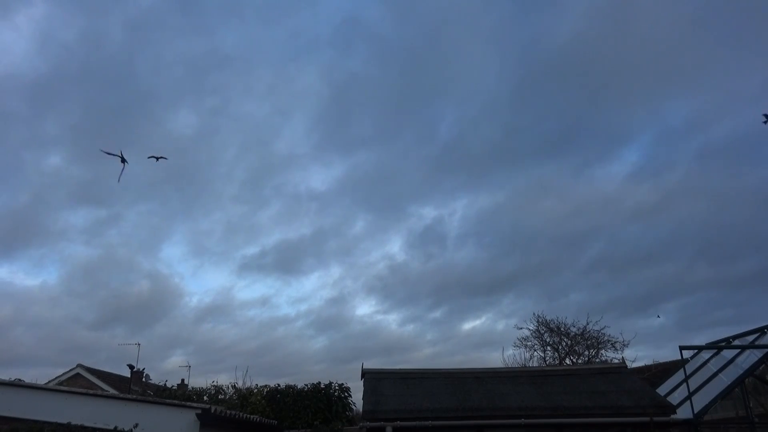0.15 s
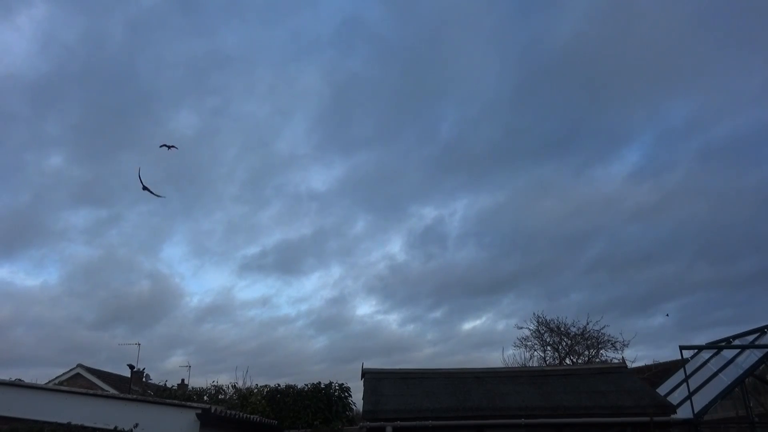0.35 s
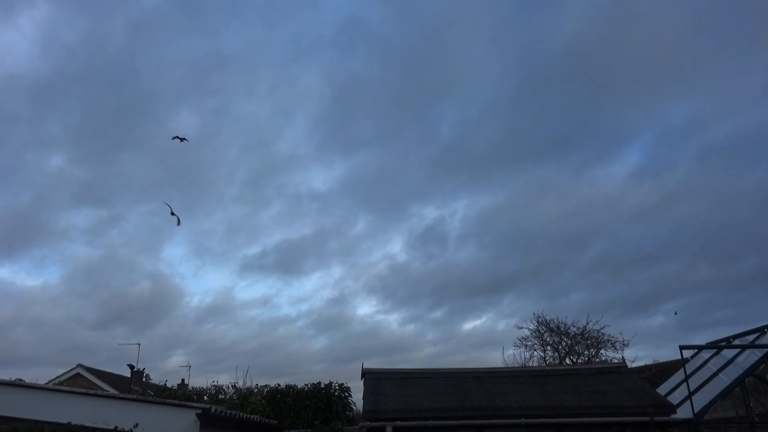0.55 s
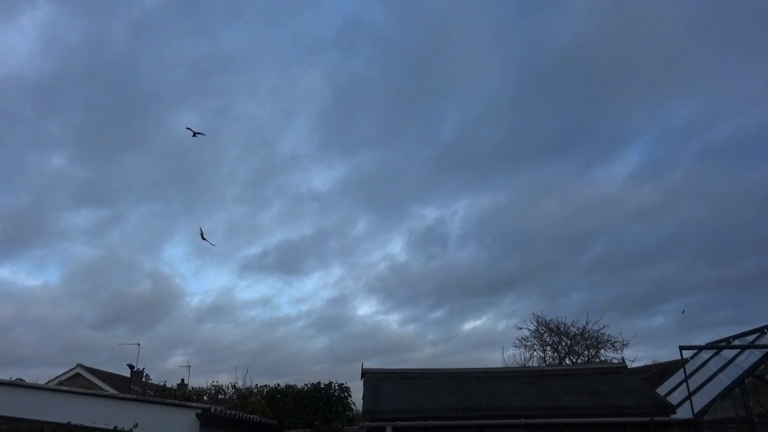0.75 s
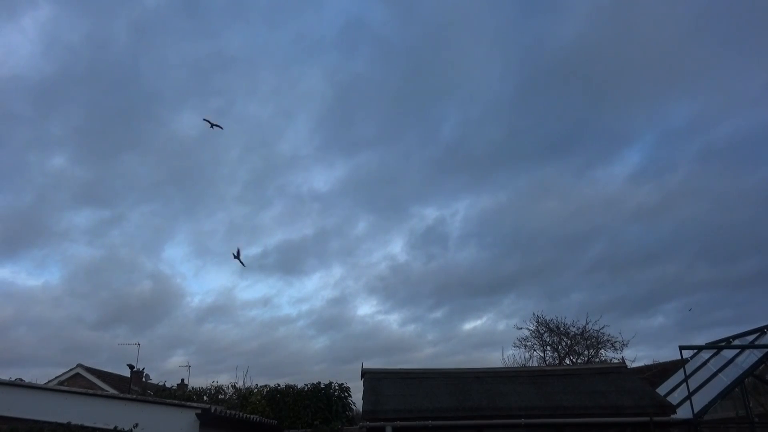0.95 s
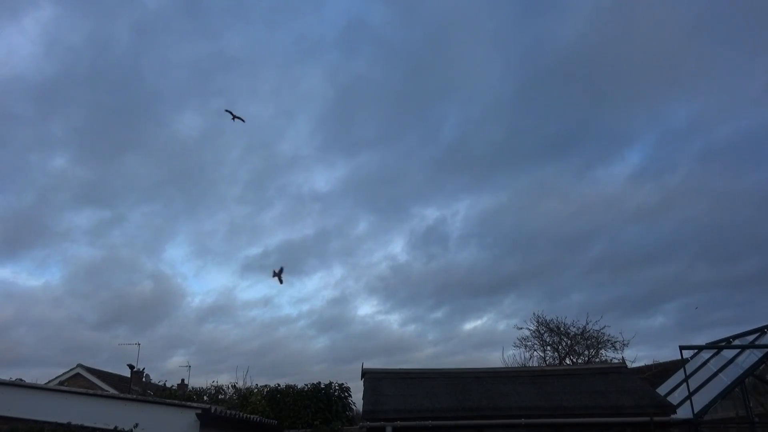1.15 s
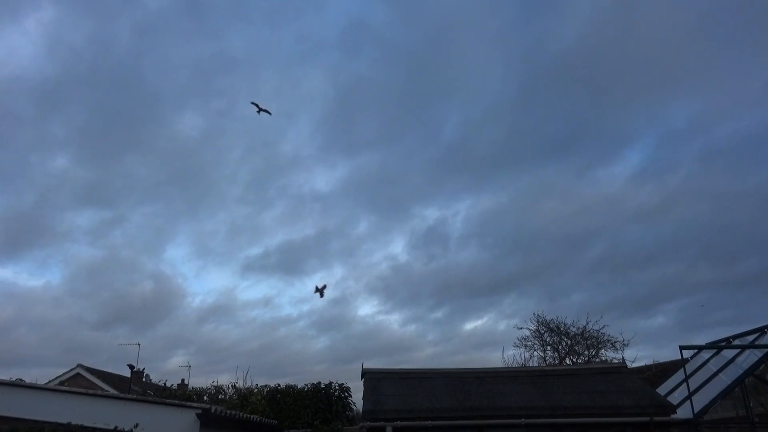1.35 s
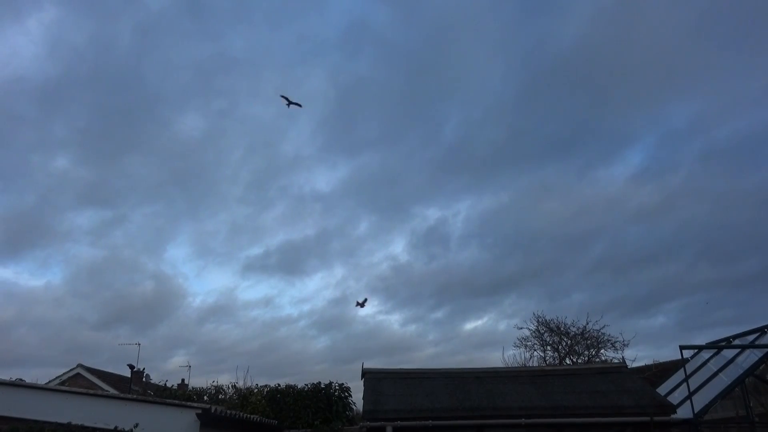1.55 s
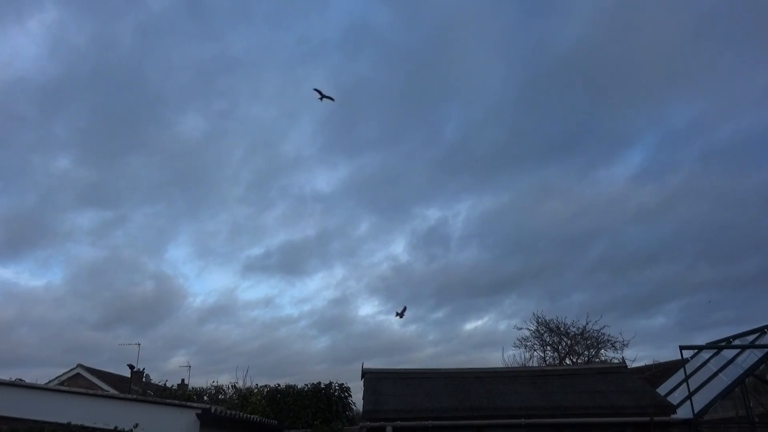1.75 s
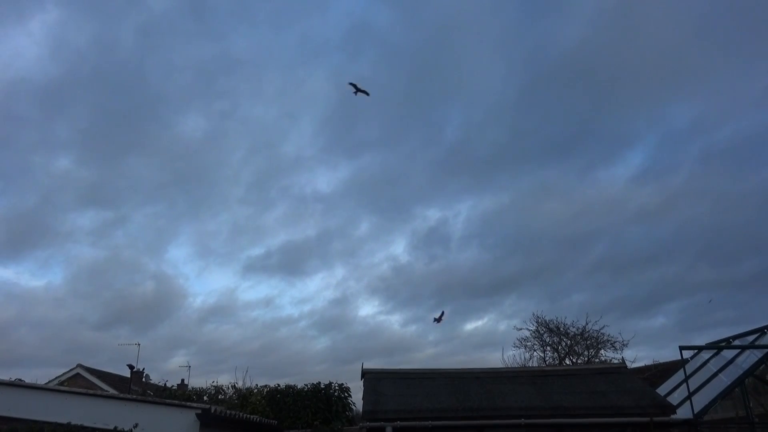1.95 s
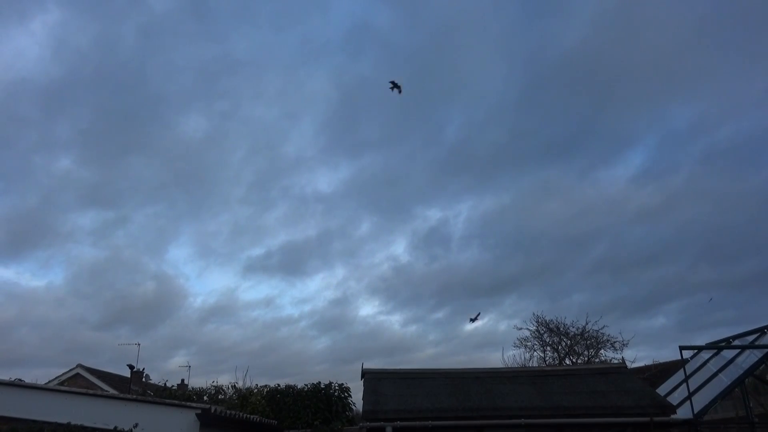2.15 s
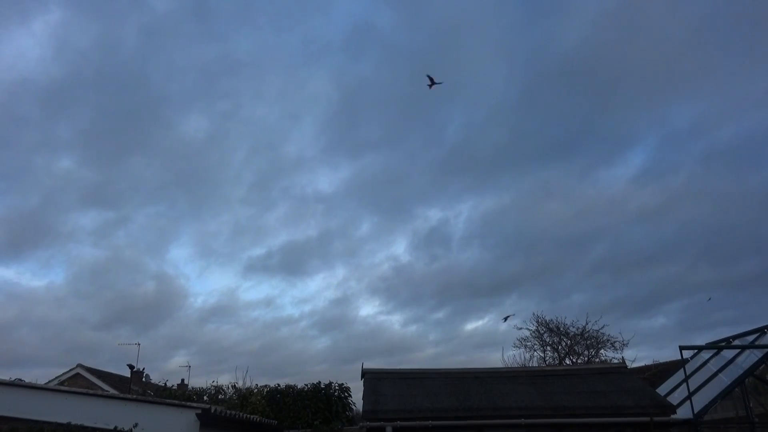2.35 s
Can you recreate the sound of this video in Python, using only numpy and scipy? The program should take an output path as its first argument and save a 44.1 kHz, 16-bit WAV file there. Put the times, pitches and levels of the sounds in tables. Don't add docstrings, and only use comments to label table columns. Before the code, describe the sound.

Thin drawn-out whistle of a circling raptor breaks into quick piped notes above low wind and traffic

```python
import sys
import numpy as np
from scipy import signal
from scipy.fft import rfft, irfft, next_fast_len
from scipy.io import wavfile
from scipy.ndimage import uniform_filter1d, map_coordinates

SR = 44100
rng = np.random.default_rng(int(sys.argv[2]) if len(sys.argv) > 2 else 0)


def boost(x):
    u = np.asarray(x, float) / 20
    return 10 ** u


def log_audio(samples):
    frames = np.atleast_2d(samples).T
    limited = np.clip(frames, -1, 1)
    pcm = np.round(limited * 32767).astype(np.int16)
    wavfile.write(sys.argv[1], SR, pcm)


N = 105840
TIME = np.arange(N) / SR

# t/s, f/Hz, level/dB
LONG_CALL_NOTES = [
    [(.203, 2380, -71), (.218, 2440, -65.5), (.264, 2740, -62), (.282, 2830, -66)],
    [(.277, 3070, -70), (.295, 3030, -75), (.31, 3000, -72), (.322, 2985, -71), (.336, 2900, -73)],
    [(.333, 2830, -63), (.352, 2686, -60.5), (.412, 2540, -59.5), (.488, 2508, -63), (.588, 2414, -66),
     (.638, 2405, -71.5), (.716, 2486, -64.5), (.772, 2430, -58.5), (.794, 2600, -61)],
    [(.792, 2793, -61.5), (.85, 2815, -59), (.958, 2840, -69), (1.04, 2845, -69), (1.075, 2925, -69.5),
     (1.118, 2910, -69), (1.14, 2900, -78)],
    [(1.168, 2916, -72), (1.188, 2939, -66.5), (1.246, 2910, -77), (1.278, 2920, -69), (1.326, 2920, -76),
     (1.352, 2950, -70.5), (1.362, 2960, -74)],
    [(1.372, 2950, -73), (1.388, 2980, -81), (1.416, 2995, -72.5), (1.46, 2976, -78), (1.48, 3000, -70),
     (1.49, 2985, -82)],
    [(1.498, 2960, -77), (1.556, 3000, -78), (1.588, 2925, -75), (1.602, 2930, -80), (1.626, 2890, -71),
     (1.645, 2810, -73), (1.66, 2900, -75), (1.68, 2940, -77), (1.71, 2920, -80)],
]
# t/s, f/Hz, level/dB
PIPED_NOTES = [
    [(1.665, 2210, -77), (1.685, 2146, -65), (1.71, 2180, -72), (1.728, 2420, -65)],
    [(1.725, 2860, -76), (1.76, 3090, -77), (1.778, 3210, -67), (1.836, 3280, -69.5), (1.865, 3190, -65.5),
     (1.906, 3070, -75), (1.962, 2880, -66.5)],
    [(1.95, 2450, -67), (1.975, 2250, -71), (1.995, 2240, -77), (2.018, 2290, -66), (2.03, 2330, -69),
     (2.048, 2700, -60)],
    [(2.047, 3104, -59.5), (2.09, 3330, -54), (2.118, 3388, -52), (2.148, 3310, -53), (2.18, 3245, -56),
     (2.216, 3166, -61), (2.238, 3110, -72)],
    [(2.25, 2575, -62), (2.27, 2360, -65), (2.283, 2290, -65), (2.296, 2450, -69)],
    [(2.296, 2700, -67), (2.303, 2690, -66), (2.31, 2480, -67), (2.322, 2430, -68), (2.336, 2580, -67),
     (2.352, 2950, -74)],
    [(2.36, 2450, -64), (2.372, 2360, -69), (2.39, 2330, -78)],
]
# t/s, left minus right level/dB
BIRD_BEARING = [(0, -6), (.78, -6), (.95, -16), (1.2, -7), (1.45, -17), (1.57, 12), (1.64, -6), (1.85, -9),
                (2.1, -6.5), (2.4, -10)]
# t/s, level/dB
ROOF_REFLECTIONS = [(.3, 4.5), (.5, -8), (1.3, 1), (1.6, 4.5), (1.95, 15), (2.1, 3), (2.3, 8)]
# t/s, length t/s, start f/Hz, end f/Hz, level/dB
FAR_CHIRPS = [(0.328, 0.034, 5200, 4280, -81.5), (0.409, 0.011, 4270, 4720, -78),
              (0.416, 0.023, 3220, 3800, -78), (0.39, .012, 4270, 4500, -82),
              (0.441, 0.011, 5330, 3950, -71), (0.449, 0.011, 4000, 4480, -70.5),
              (0.457, 0.01, 4400, 3880, -80), (0.46, 0.011, 4400, 5200, -84),
              (0.477, 0.011, 3970, 5030, -83), (0.514, .01, 3730, 4400, -84),
              (1.285, 0.034, 3190, 3880, -77), (1.415, 0.022, 3830, 3850, -83),
              (1.405, .018, 4150, 4150, -87), (1.708, .012, 5130, 5060, -77), (1.709, .02, 3300, 5000, -74),
              (1.721, 0.013, 5800, 7700, -82), (1.742, .012, 4100, 3400, -78),
              (1.746, 0.021, 4800, 5220, -75), (1.753, .011, 8200, 3000, -75), (1.76, .01, 4900, 5500, -76),
              (1.764, .011, 7000, 3400, -73), (1.773, 0.013, 5730, 4840, -76),
              (1.814, 0.0093, 5130, 5000, -83), (1.862, .016, 5100, 5040, -85),
              (2.29, .016, 4670, 4400, -83)]
# t/s, length t/s, centre f/Hz, level/dB
CHATTER_BURSTS = [
    (0.444, .04, 4650, -74),
    (1.73, 0.015, 4300, -71),
    (1.775, 0.028, 5200, -75),
    (1.762, 0.098, 2700, -66.5),
    (1.85, 0.084, 4900, -80),
    (2.105, .06, 3930, -74),
    (2.286, 0.16, 4900, -77),
]
# t/s, length t/s, level/dB
WIND_SURGES = [(0.23, 0.11, -43.5), (0.452, 0.13, -41), (0.563, 0.047, -37.5), (0.684, 0.079, -30.5),
               (0.804, 0.12, -39), (0.983, 0.047, -44), (1.132, 0.081, -49), (1.285, 0.075, -39),
               (1.412, 0.094, -40.5), (1.537, 0.076, -37), (1.668, 0.082, -36), (1.77, 0.07, -44.5),
               (1.907, 0.059, -42.5), (2.012, 0.081, -42), (2.145, 0.04, -48.5), (2.27, 0.051, -57)]
# t/s, length t/s, level/dB, top f/Hz
PORT_EDDIES = [(0.169, 0.046, -56, 90), (0.281, 0.087, -64, 80), (0.403, 0.1, -54, 92),
               (0.548, 0.1, -55, 102), (.65, 0.054, -53, 90), (.74, 0.093, -55, 89.5),
               (.87, 0.072, -58.5, 69.5), (1.04, 0.14, -55.5, 55), (1.13, 0.043, -51.5, 50),
               (1.28, 0.12, -50, 43.6), (1.335, 0.057, -49, 60), (1.395, 0.017, -42.5, 80),
               (1.424, 0.035, -36, 57.4), (1.465, 0.014, -36, 55), (1.52, 0.053, -37.5, 70),
               (1.565, 0.024, -38.5, 75), (1.62, .025, -42.5, 90), (1.66, 0.025, -39.5, 81),
               (1.69, 0.035, -45.5, 45), (1.742, 0.07, -53, 110), (1.8, 0.037, -51, 100),
               (1.842, 0.051, -45.5, 100), (1.878, 0.033, -44, 110), (1.915, 0.019, -51, 90),
               (1.969, 0.087, -60.5, 71), (2.124, 0.12, -67, 59.5)]
# f/Hz, level/dB
SURGE_SPECTRUM = [(4, 0.5), (10, -6), (20, -1), (35, -14), (60, -20), (120, -41)]
# f/Hz, level/dB
ROAD_SPECTRUM = [(40, -8), (160, -19), (450, -14.5), (900, -9), (1250, -16), (1650, -18.5), (2200, -25.5),
                 (3200, -36.5)]
# f/Hz, correlation/1
ROAD_LIKENESS = [(100, 0.11), (300, 0.67), (700, 0.86), (1500, 0.74), (4000, 0.69)]
# f/Hz, left minus right level/dB
ROAD_LEAN = [(100, 2.5), (300, -0.5), (700, -3), (1500, -1.5), (5000, 0)]
# f/Hz, level/dB
HISS_SPECTRUM = [(200, 6.7), (3000, 0), (8000, -2), (13000, -2), (16000, -1.5)]

EDGE_S, FLUTTER_DB, WAVER_HZ = .009, .9, 6
OCTAVE_DB, OCTAVE_FADE_S, REGISTER_HZ = -13, .025, 2650
BREATH_DB, SHIMMER_DB = -22, 1.1
GABLE_S, GABLE_DB = .142, -25
YARD_T60_S, YARD_DB, YARD_RISE_S, RUSTLE = .5, -11, .04, .8
CHIRP_ROUGH, CHIRP_YARD_DB = .35, -5
CHATTER_WIDE, CHATTER_GRAIN_DB = .19, 2
CALM_DB, SURGE_PAN_DB, SURGE_LIKENESS = -60.5, -1, .97
EDDY_LOW_HZ, EDDY_SLOPE, EDDY_PAN_DB, EDDY_LIKENESS = 20.5, 1.0, -6, .94
ROAD_DB, TYRE_HZ, TYRE_WIDE_HZ, TYRE_DB = -53.5, 987, 75, 4
HISS_DB = -69.5


def kite():
    voice = np.zeros(N)
    waver = WAVER_HZ * wobble(60)
    flutter = FLUTTER_DB * (wobble(24.66) + wobble(90))
    for note in LONG_CALL_NOTES + PIPED_NOTES:
        s, hz, db = np.transpose(note)
        pitch = uniform_filter1d(np.interp(TIME, s, hz), size=300) + waver
        phase = 2 * np.pi * np.cumsum(pitch) / SR
        is_low = hz[0] < REGISTER_HZ
        octave = boost(OCTAVE_DB) * np.exp(-((TIME - s[0]) / OCTAVE_FADE_S) ** 2) * is_low
        tone = np.sin(phase) + octave * np.sin(2 * phase)
        gate = np.clip(np.minimum(TIME - s[0], s[-1] - TIME) / EDGE_S + .5, 0, 1) ** 2
        level = boost(np.interp(TIME, s, db) + flutter)
        voice += np.sqrt(2) * gate * level * tone
    voice = voice * (1 + boost(BREATH_DB) * wobble(1800))
    wet = voice * boost(np.interp(TIME, *np.transpose(ROOF_REFLECTIONS)))
    shimmer = boost(SHIMMER_DB * np.array([wobble(34.7), wobble(34.87)]))
    direct = voice * shimmer * panned(np.interp(TIME, *np.transpose(BIRD_BEARING)))
    delayed = np.pad(wet, (round(GABLE_S * SR), 0))[:N]
    echo = boost(GABLE_DB) * delayed * shimmer[::-1]
    return direct + echo + yard(wet, YARD_DB)


def yard(x, db):
    t = np.arange(SR // 2) / SR
    decay = boost(-60 * t / YARD_T60_S) * np.clip(t / YARD_RISE_S, 0, 1)
    tail = rng.standard_normal((2, len(t))) * decay
    smear = np.sqrt(1 - RUSTLE ** 2) + RUSTLE * np.array([wobble(220), wobble(220)])
    answer = signal.fftconvolve(x[None], tail / np.linalg.norm(tail[0]), axes=1)[:, :N]
    return boost(db) * smear * answer


def small_birds():
    chirps = np.zeros(N)
    for s, length, start_hz, end_hz, db in FAR_CHIRPS:
        u = np.clip((TIME - s) / length, 0, 1)
        pitch = start_hz + (end_hz - start_hz) * u
        phase = 2 * np.pi * np.cumsum(pitch) / SR
        chirps += boost(db) * np.sin(np.pi * u) * np.sin(phase)
    chirps = 2 * chirps * (1 + CHIRP_ROUGH * wobble(500))
    return chirps + yard(chirps, CHIRP_YARD_DB)


def chatter():
    def band(hz, centre_hz):
        return np.exp(-(np.log((hz + 1) / centre_hz) / CHATTER_WIDE) ** 2)

    rows = [(s, length, db, hz) for s, length, hz, db in CHATTER_BURSTS]
    return puffs(rows, band, 0) * boost(CHATTER_GRAIN_DB * wobble(120))


def wind():
    def deep(hz):
        return boost(along(SURGE_SPECTRUM + [(400, -120)], hz))

    def eddy(hz, top_hz):
        low_cut = hz ** 2 / (hz ** 2 + EDDY_LOW_HZ ** 2)
        return low_cut / (1 + (hz / top_hz) ** 2) ** EDDY_SLOPE

    calm = boost(CALM_DB) * pair(rng.standard_normal((2, N)), deep, lambda hz: SURGE_LIKENESS + 0 * hz)
    rocking = calm + puffs(WIND_SURGES, deep, SURGE_LIKENESS)
    buffeting = puffs(PORT_EDDIES, eddy, EDDY_LIKENESS)
    return rocking * panned(SURGE_PAN_DB)[:, None] + buffeting * panned(EDDY_PAN_DB)[:, None]


def road():
    z = signal.stft(rng.standard_normal((2, N + 512)), nperseg=512)[2]
    patches = uniform_filter1d(rng.standard_normal(z.shape[1:]), size=4, axis=0)
    patches = uniform_filter1d(patches, size=12, axis=1)
    noise = signal.istft(z * boost(1.24 * unit(patches)), nperseg=512)[1][:, :N]
    spectrum = [(4.9, -49)] + ROAD_SPECTRUM + [(6000, -54.0), (13000, -120)]

    def colour(hz):
        tyre_db = TYRE_DB * np.exp(-((hz - TYRE_HZ) / TYRE_WIDE_HZ) ** 2)
        return boost(along(spectrum, hz) + tyre_db)

    roar = pair(noise, colour, lambda hz: along(ROAD_LIKENESS, hz))
    leaning = filtered(roar, lambda hz: panned(along(ROAD_LEAN, hz)))
    return boost(ROAD_DB + 0.048 * wobble(2.0)) * leaning


def preamp_hiss():
    hiss = filtered(rng.standard_normal((2, N)), lambda hz: boost(along(HISS_SPECTRUM, hz)))
    return boost(HISS_DB) * unit(hiss)


def puffs(rows, colour, alike):
    t = np.arange(-SR // 5, SR // 5) / SR
    wide = np.zeros((2, N + SR))
    for s, length, db, *top_hz in rows:
        bell = np.exp(-2 * (t / length) ** 2)
        noise = rng.standard_normal((2, len(t)))
        puff = bell * pair(noise, lambda hz: colour(hz, *top_hz), lambda hz: alike + 0 * hz)
        energy = np.sqrt(np.mean(bell ** 2))
        wide[:, round(s * SR):][:, :len(t)] += boost(db) * unit(puff) * energy
    return wide[:, SR // 5:][:, :N]


def pair(noise, gain, alike):
    def mid_side(hz):
        turn = np.arccos(np.clip(alike(hz), -1, 1)) / 2
        return gain(hz) * np.array([np.cos(turn), np.sin(turn)])

    mid, side = filtered(noise, mid_side)
    return unit(np.array([mid + side, mid - side]))


def panned(db):
    return boost(np.array([db / 2, -db / 2]))


def filtered(x, response):
    m = next_fast_len(x.shape[-1] + 8192)
    spectrum = rfft(x, m) * response(np.fft.rfftfreq(m, 1 / SR))
    return irfft(spectrum, m)[..., :x.shape[-1]]


def wobble(rate):
    knots = rng.standard_normal(int(N * rate / SR) + 4)
    return map_coordinates(knots, [TIME * rate])


def along(points, hz):
    f, v = np.transpose(points)
    return np.interp(np.log(hz + 1), np.log(f + 1), v)


def unit(x):
    return x / np.sqrt(np.mean(x ** 2) + 1e-20)


def scene():
    return kite() + small_birds() + chatter() + wind() + road()


def roll_off(x):
    return signal.sosfilt(signal.butter(12, 15750, fs=SR, output="sos"), x)


def record(dry):
    mix = dry + preamp_hiss()
    return roll_off(mix)


dry = scene()
out = record(dry)
log_audio(out)
```